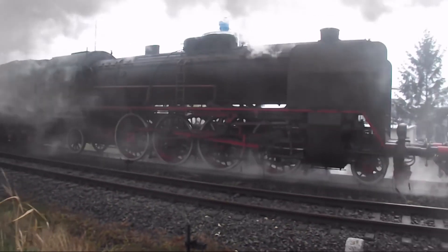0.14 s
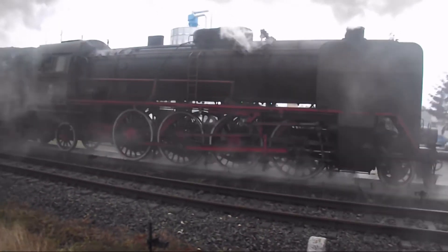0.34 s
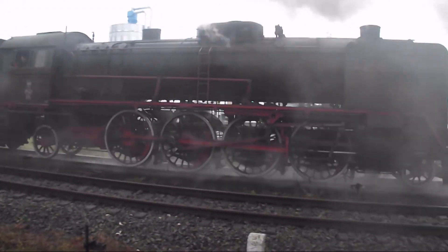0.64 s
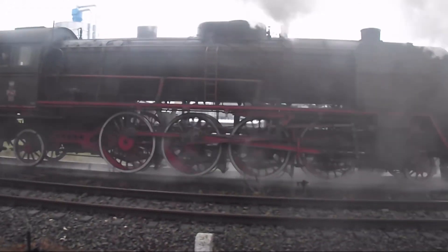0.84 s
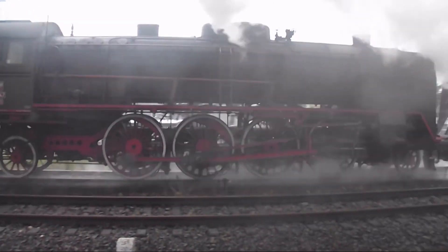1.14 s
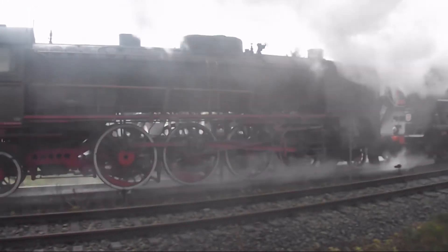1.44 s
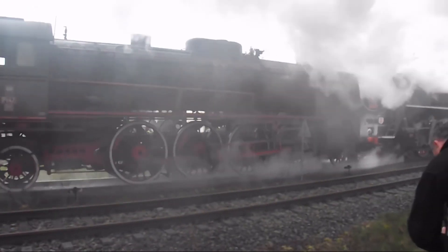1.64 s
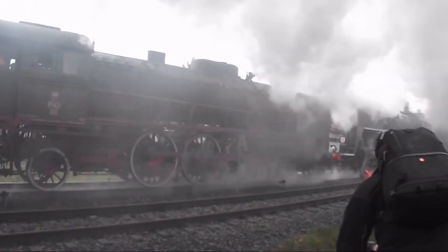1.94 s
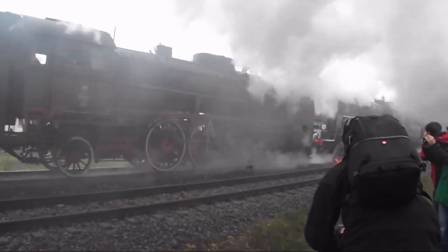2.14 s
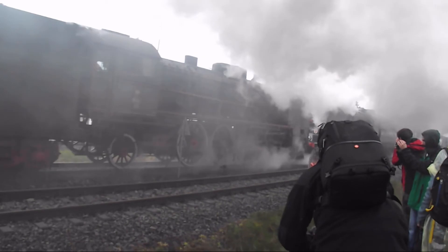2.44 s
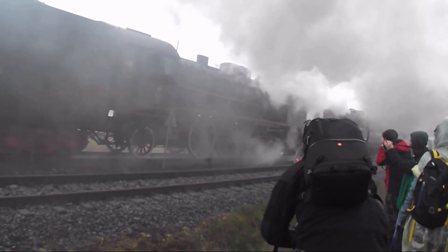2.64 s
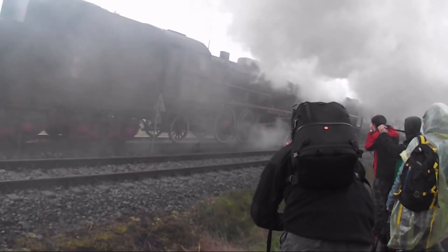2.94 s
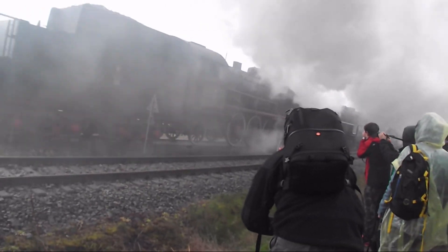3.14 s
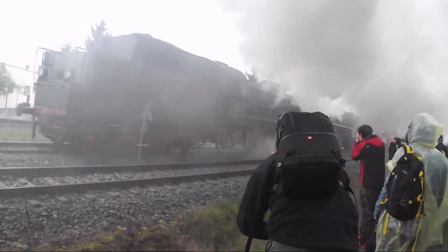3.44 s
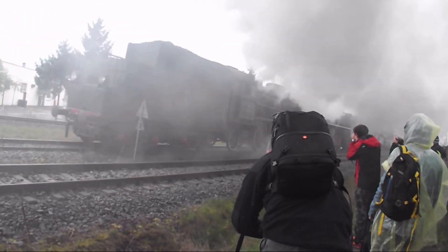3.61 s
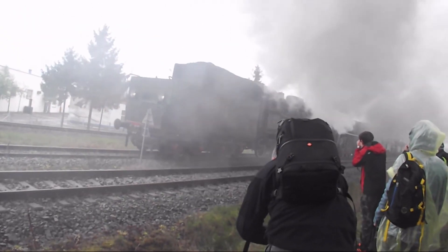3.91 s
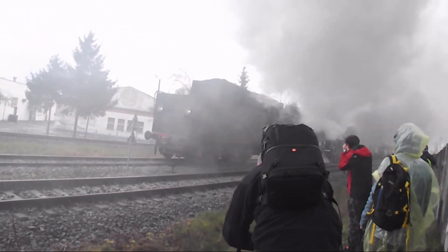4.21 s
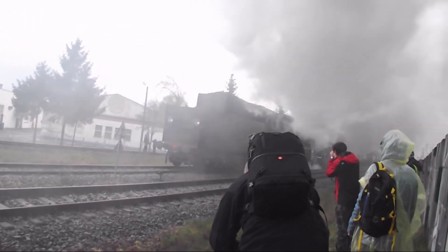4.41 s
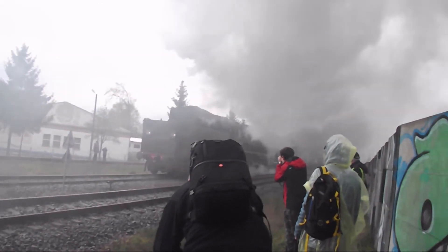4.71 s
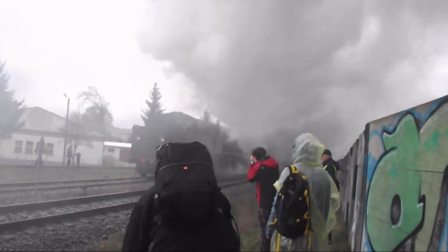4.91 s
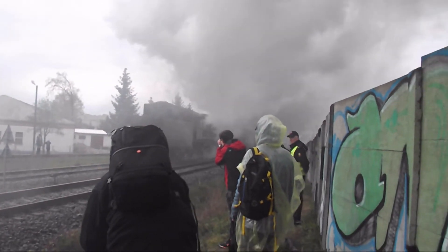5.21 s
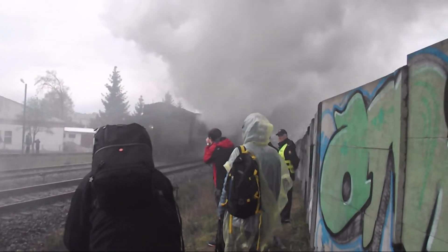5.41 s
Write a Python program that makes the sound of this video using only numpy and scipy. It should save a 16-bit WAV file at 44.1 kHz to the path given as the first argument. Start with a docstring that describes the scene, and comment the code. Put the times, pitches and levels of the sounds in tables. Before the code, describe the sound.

A steam locomotive holds one long whistle, several tones sounding together as a shrill, breathy chord. About half a second in, a single sharp crack briefly overloads the microphone. The whistle carries on as the engine rolls past and away, its upper tones wavering and shifting in brightness, over hissing steam and a low rumble. Heard from beside the track, the level repeatedly dips and swells back.

```python
"""Beside a railway track: a steam locomotive rolls past and away, holding one long chime whistle blast.
Three bells sound a chord; two also overblow near the octave, wandering as the steam jet varies.
Groups of partials turn from a front to a back level and beam past the listener, over hiss and rumble.
Early on the level leaps into overload with one sharp crack; later it keeps dropping and swelling back."""
import sys
import numpy as np
from scipy import signal
from scipy.fft import rfft, irfft, next_fast_len
from scipy.io import wavfile
from scipy.ndimage import uniform_filter1d

SR = 44100
rng = np.random.default_rng(int(sys.argv[2]) if len(sys.argv) > 2 else 0)


def materialize(psi):
    """Save the field psi as 16-bit PCM at rate SR to the path in sys.argv[1].

    A 1-D psi becomes a single channel; in a 2-D psi each row is a channel.
    """
    bounded = np.clip(np.atleast_2d(psi).T, -1, 1)
    quanta = np.round(bounded * 32767).astype(np.int16)
    wavfile.write(sys.argv[1], SR, quanta)


N = 245195
TIME = np.arange(N) / SR

# Low bell pitch. Each row: time in seconds, pitch in Hz.
LOW_PITCH_HZ = [(0, 403.7), (.6, 403), (1.1, 406.9), (1.8, 406.8), (2.6, 408.6), (3.5, 407.7), (4.5, 409.3),
                (5.56, 405.3)]
# Fundamental, strong ahead of the engine, fading in and out behind. Each row: time in seconds, level in dB.
LOW_ROOT_DB = [(0, -13), (.5, -12.5), (1.0, -14.5), (1.52, -17), (1.76, -27), (2.0, -18.5), (2.35, -25.5),
               (2.8, -21.5), (3.38, -26), (3.55, -21.5), (3.8, -26), (4.05, -20), (4.42, -28), (4.62, -22),
               (4.8, -29), (4.93, -20), (5.56, -24)]
# Upper and top overtones. Each row: harmonic number, relative level in dB.
LOW_UPPER_DB = [(5, -7), (6, -11.5)]
LOW_TOP_DB = [(6, -1.5), (7, -0.5), (8, -21), (9, -10)]


def low_bell():
    """Deepest steam-blown pipe: pure at first, reedy as one overtone after another beams past."""
    second_db = passing(front_db=-30.5, back_db=-37, beam_s=0.36, width_s=0.23, beam_db=0, fade_db=5.5)
    third_db = passing(front_db=-27, back_db=-32, beam_s=1.844, width_s=0.32, beam_db=13, fade_db=2)
    upper_db = passing(front_db=-33, back_db=-32, beam_s=2.51, width_s=0.63, beam_db=11, fade_db=-0.5)
    top_db = passing(front_db=-33.5, back_db=-32, beam_s=0.13, width_s=0.11, beam_db=8.5, fade_db=3)
    phase = pipe_phase(curves(LOW_PITCH_HZ)[0], waver=0.001013, jitter=0.0028)
    root = from_db(curves(LOW_ROOT_DB)[0]) * partials(phase, [(1, 0)], scatter=0.016, fade_hz=20)
    halo = from_db(-34) * partials(phase, [(1, 0)], scatter=0.81, fade_hz=6.8)
    second = from_db(second_db) * partials(phase, [(2, 0)], scatter=0.14, fade_hz=20)
    third = from_db(third_db) * partials(phase, [(3, 0)], scatter=0.16, fade_hz=18)
    upper = partials(phase, [(4, -1.2)], scatter=0.13, fade_hz=22.6)
    upper += partials(phase, LOW_UPPER_DB, scatter=0.33, fade_hz=21.1)
    top = partials(phase, LOW_TOP_DB, scatter=0.77, fade_hz=24.3)
    return root + halo + second + third + from_db(upper_db) * upper + from_db(top_db) * top


# Middle bell overtones, brightest behind the engine. Each row: time in seconds, lower and top gain in dB.
MIDDLE_OVERTONES_DB = [(0, -35.5, -43), (.6, -38.5, -42), (1.25, -34.5, -43), (1.6, -29.5, -32),
                       (2.06, -33.5, -31), (2.5, -28, -21.5), (2.9, -26, -26), (3.25, -27, -22.5),
                       (3.7, -27.5, -26), (3.95, -34, -29), (4.2, -29.5, -26.5), (4.9, -39.5, -28.5),
                       (5.35, -25.5, -25), (5.56, -32, -29)]
# Middle and high bell spectra. Each row: harmonic number, relative level in dB.
MIDDLE_LOWER_DB = [(2, -15.5), (3, 0), (4, -1.5), (5, -5.5)]
MIDDLE_TOP_DB = [(6, -5), (7, -1.5), (8, -17.5), (10, -30)]
HIGH_HARMONICS_DB = [(1, 5.5), (2, 3.5), (3, -15), (5, -10), (7, 8)]
MIDDLE_HZ, HIGH_HZ = 450.3, 468.3


def upper_bells():
    """Middle pipe, loudest just after the pass, and a weak high pipe that follows its lower overtones."""
    root_db = passing(front_db=-30.5, back_db=-30.5, beam_s=2.56, width_s=1.08, beam_db=6, fade_db=1.3)
    lower_db, top_db = curves(MIDDLE_OVERTONES_DB)
    phase = pipe_phase(MIDDLE_HZ, waver=0.001066, jitter=0.00295)
    root = from_db(root_db) * partials(phase, [(1, 0)], scatter=0.066, fade_hz=19)
    lower = partials(phase, MIDDLE_LOWER_DB, scatter=0.25, fade_hz=11)
    top = from_db(top_db) * partials(phase, MIDDLE_TOP_DB, scatter=0.16, fade_hz=28)
    high_phase = pipe_phase(HIGH_HZ, waver=0.002, jitter=0.00372)
    high = from_db(-18) * partials(high_phase, HIGH_HARMONICS_DB, scatter=0.41, fade_hz=3.5)
    return root + from_db(lower_db) * (lower + high) + top


# Overblown low bell. Each row: time in seconds, pitch in Hz, fundamental, overtone and top gain in dB.
LOW_SHRIEK_HZ_DB = [(0, 836.5, -39, -36.5, -53), (.6, 829, -25, -27.5, -54), (.92, 828, -34, -27.5, -57),
                    (1.06, 826.4, -22.5, -30, -44), (1.42, 825.4, -20.5, -28, -45.5),
                    (1.62, 822.5, -20.5, -23.5, -37.5), (1.76, 822, -23.5, -21, -45.5),
                    (1.89, 809, -30, -36, -60), (2.2, 813, -24.5, -27, -51), (2.85, 805.6, -25.5, -46, -55),
                    (3.28, 798.6, -23, -32, -56), (3.44, 823.5, -21, -19.5, -45.5),
                    (4.08, 825, -18.5, -23, -43), (4.25, 822.4, -22.5, -16, -39),
                    (4.47, 822.5, -22, -17.5, -39), (4.75, 822.2, -21.5, -20, -43),
                    (5.25, 824.8, -23.5, -21, -42.5), (5.56, 828, -25, -28, -45)]
# Its top and edge partials. Each row: harmonic number, relative level in dB.
LOW_SHRIEK_TOP_DB = [(2, 5.9), (5, 0.7), (6, 0.5)]
LOW_SHRIEK_EDGE_DB = [(7, 1), (8, -9), (9, -13), (10, -12), (12, -21)]
# Air and steam absorb the edge partials with distance. Each row: time in seconds, gain in dB.
NEARNESS_DB = [(0, -6), (1.6, 0), (4, -9), (5.56, -22)]


def low_shriek():
    """The low bell overblows near its octave, going flat and weak in mid-blast."""
    hz, root_db, overtones_db, top_db = curves(LOW_SHRIEK_HZ_DB)
    pass_db = passing(front_db=-6, back_db=-5.5, beam_s=0.26, width_s=0.26, beam_db=7, fade_db=1.5)
    phase = pipe_phase(hz, waver=0.00085, jitter=0.0014)
    root = from_db(root_db) * partials(phase, [(1, -0.9)], scatter=0.13, fade_hz=28.2)
    third = from_db(overtones_db) * partials(phase, [(3, 0.0043)], scatter=0.25, fade_hz=23.3)
    fourth = from_db(overtones_db + pass_db) * partials(phase, [(4, 0)], scatter=0.32, fade_hz=26)
    edge = from_db(curves(NEARNESS_DB)[0]) * partials(phase, LOW_SHRIEK_EDGE_DB, scatter=0.2, fade_hz=25)
    top = partials(phase, LOW_SHRIEK_TOP_DB, scatter=0.23, fade_hz=25)
    return root + third + fourth + from_db(top_db) * (top + edge)


# Overblown middle bell. Each row: time in seconds, pitch in Hz, fundamental and overtone gain in dB.
MIDDLE_SHRIEK_HZ_DB = [(0, 909, -36.5, -29.5), (.9, 912, -37, -23.5), (1.08, 907, -26.5, -26),
                       (1.6, 903, -29.5, -27.5), (1.7, 836, -27.5, -24), (1.9, 800, -35, -25.5),
                       (2.5, 785, -36, -40), (2.78, 738, -32.5, -29), (3.4, 766, -34, -26),
                       (3.7, 794, -33, -26.5), (4.35, 773, -33, -41), (4.85, 816, -45, -28.5),
                       (4.99, 843, -25, -21), (5.06, 878, -24, -29), (5.25, 879, -24.5, -17),
                       (5.56, 882, -22.5, -19)]
# Its overtones. Each row: harmonic number, relative level in dB.
MIDDLE_SHRIEK_TONE_DB = [(2, -19.5), (3, -2.5), (4, -17.5)]
FIFTH_DB, SCREECH_DB, FIFTH_DB_PER_DB = -36.5, -18.5, 2.7


def middle_shriek():
    """The middle bell overblows: it breaks, sags and snaps back; strong overtones bring out the fifth."""
    hz, root_db, overtones_db = curves(MIDDLE_SHRIEK_HZ_DB)
    fifth_db = FIFTH_DB + FIFTH_DB_PER_DB * (overtones_db - SCREECH_DB)
    phase = pipe_phase(hz, waver=0.001083, jitter=0.0022)
    root = from_db(root_db) * partials(phase, [(1, 0)], scatter=0.11, fade_hz=31)
    overtones = from_db(overtones_db) * partials(phase, MIDDLE_SHRIEK_TONE_DB, scatter=0.27, fade_hz=15)
    fifth = from_db(fifth_db) * partials(phase, [(5, 0)], scatter=0.15, fade_hz=17)
    return root + overtones + fifth


# Steam treble. Each row: time in seconds, jet, hiss and spray level in dB.
STEAM_LEVELS_DB = [(0, -26, -40, -53), (.18, -28, -46, -50), (.38, -29.5, -48, -59), (.6, -31, -48, -57.5),
                   (.92, -31.5, -44, -55), (1.08, -24.5, -44, -52.5), (1.45, -24.5, -39, -48),
                   (1.65, -24, -37, -41.5), (1.92, -25.5, -38.5, -55), (2.6, -21.5, -41.5, -53.5),
                   (3.2, -23, -39, -54.5), (3.58, -21.5, -41.5, -56), (3.75, -19.5, -35.5, -56),
                   (4.02, -25.5, -42, -55), (4.35, -24, -46, -61), (4.67, -20, -46, -62),
                   (4.85, -23, -51.5, -62.5), (5.56, -22, -50, -61.5)]
# Steam spectra. Each row: frequency in Hz, relative density in dB.
JET_HZ_DB = [(1500, -14), (2200, -7.5), (2500, -2.5), (2900, 4), (3250, 3.5), (3480, -10.5), (4000, -12.5),
             (5000, -21), (7000, -36)]
HISS_HZ_DB = [(3000, 3), (4500, 3.5), (6000, 2), (7300, -3), (8500, -15), (11000, -33.5)]
SPRAY_HZ_DB = [(6000, -11), (8500, 3), (11000, -1.5), (13000, -10.5), (15800, -14)]


def steam():
    """The whistle's turbulent jet, with hiss and fine spray that are brightest as the cylinders pass."""
    jet_db, hiss_db, spray_db = curves(STEAM_LEVELS_DB)
    jet = from_db(jet_db) * noise(JET_HZ_DB, flutter_db=2.5)
    hiss = from_db(hiss_db) * noise(HISS_HZ_DB, flutter_db=1.9)
    spray = from_db(spray_db) * noise(SPRAY_HZ_DB, flutter_db=2.4)
    return jet + hiss + spray


# Rumble and exhaust spectra. Each row: frequency in Hz, relative density in dB.
RUMBLE_HZ_DB = [(20, 2.5), (35, -10), (60, -16.5), (115, -18.5), (145, -20.5), (178, -15), (230, -21.5),
                (330, -21), (600, -23.5), (1200, -35.5)]
EXHAUST_HZ_DB = [(250, -10), (350, -15), (440, -8), (580, -7.5), (800, 6.5), (1030, -5), (1300, 5.5),
                 (1700, 5), (2200, 3.5), (3000, 5), (5000, -11)]
# Dull thuds. Each row: peak time in seconds, rise of the rumble in dB.
THUDS_DB = [(2.14, 3), (2.87, 2), (4.471, 9)]
THUD_WIDTH_S = 0.016


def engine():
    """The passing engine rumbles, with a few thuds and the rush of its exhaust."""
    rumble_db = passing(front_db=-37.5, back_db=-37.5, beam_s=2.1, width_s=1.47, beam_db=6.5, fade_db=1)
    thuds_db = sum(db * np.exp(-0.5 * ((TIME - peak_s) / THUD_WIDTH_S) ** 2) for peak_s, db in THUDS_DB)
    exhaust_db = passing(front_db=-32, back_db=-31, beam_s=2.8, width_s=0.9, beam_db=5.5, fade_db=-1.2)
    rumble = from_db(rumble_db + thuds_db) * noise(RUMBLE_HZ_DB, flutter_db=0.5)
    exhaust = from_db(exhaust_db) * noise(EXHAUST_HZ_DB, flutter_db=2.5)
    return rumble + exhaust


# Rasp spectrum. Each row: frequency in Hz, relative density in dB.
RASP_HZ_DB = [(55, -4), (110, 12), (220, -6), (1200, -8), (3800, -3), (7000, -12), (14000, -25)]
CRACK_START_S = 0.4537


def rasp(gain_db, t60_s):
    """A brief burst of noise that roughens the crack."""
    since_s = TIME - CRACK_START_S
    envelope = (since_s > 0) * from_db(gain_db - 60 * abs(since_s) / t60_s)
    return envelope * noise(RASP_HZ_DB, flutter_db=0)


# The crack's leap into overload. Each row: time since its start in seconds, gain in dB.
CRACK_GAIN_DB = [(0, 29), (.012, 29), (.025, 23), (.036, 16), (.046, 9), (.056, 3), (.12, 0)]
# Abrupt level drops. Each row: time in seconds, depth in dB.
DROPS_DB = [(0.735, 2.5), (0.841, 2.5), (0.912, 3.5), (1.092, 3), (1.312, 3.5), (1.947, 4), (2.187, 2.5),
            (2.267, 0.5), (2.356, 2.5), (2.67, 1), (2.723, 4.5), (2.778, 5), (2.895, 4.5), (3.011, 3),
            (3.139, 3.5), (3.275, 3.5), (3.368, 6), (3.574, 5), (4.127, 5.5), (4.295, 4.5), (4.371, 4),
            (4.484, 6.5), (4.708, 6), (4.799, 5.5), (4.887, 4.5), (4.997, 5), (5.069, 1.5), (5.15, 3.5),
            (5.266, 5), (5.323, 3)]


def level_jumps_db(swell_s, recover_s, swell_share):
    """The level leaps once for the crack; it swells before each drop and recovers after it."""
    gain_db = np.interp(TIME - CRACK_START_S, *np.transpose(CRACK_GAIN_DB), left=0, right=0)
    for drop_s, depth_db in DROPS_DB:
        since_s = TIME - drop_s
        swell = swell_share * np.exp(-abs(since_s) / swell_s)
        dip = (1 - swell_share) * np.exp(-abs(since_s) / recover_s)
        gain_db += depth_db * np.where(since_s < 0, swell, -dip)
    return uniform_filter1d(gain_db, size=2)


PASS_S, TURN_S, REFLECTION_FADE_HZ = 1.54, 0.17, 3.3
BEAM_STEEPNESS = 3.2  # 2 is Gaussian; more flattens the top


def passing(front_db, back_db, beam_s, width_s, beam_db, fade_db):
    """Level in dB of a source rolling by: it turns from front to back and its beam sweeps past once."""
    turned = 0.5 + 0.5 * np.tanh((TIME - PASS_S) / (2 * TURN_S))
    beam = np.exp(-0.5 * abs((TIME - beam_s) / width_s) ** BEAM_STEEPNESS)
    reflections_db = fade_db * turned * drift(REFLECTION_FADE_HZ)  # off ground and boiler
    return front_db + (back_db - front_db) * turned + beam_db * beam + reflections_db


def pipe_phase(hz, waver, jitter):
    """Phase of a pipe whose pitch wavers with the steam and trembles with the jet's turbulence."""
    pitch_hz = hz * (1 + waver * drift(6.89) + jitter * drift(82.8))
    return 2 * np.pi * np.cumsum(pitch_hz) / SR


def partials(phase, harmonics_db, scatter, fade_hz):
    """Pipe harmonics; the surroundings scatter a share of each one's power, which fades at random."""
    tone = 0
    for harmonic, db in harmonics_db:
        angle = round(harmonic) * phase + rng.uniform(0, 2 * np.pi)
        in_phase = np.sqrt(2 * (1 - scatter)) + np.sqrt(scatter) * drift(fade_hz)
        quadrature = np.sqrt(scatter) * drift(fade_hz)
        tone += from_db(db) * (in_phase * np.cos(angle) + quadrature * np.sin(angle))
    return tone


def noise(spectrum, flutter_db):
    """Turbulent noise of unit power with a given spectrum, its level fluttering."""
    hz, db = np.transpose(spectrum)
    size = next_fast_len(N)
    bins_hz = np.maximum(np.arange(size // 2 + 1) * SR / size, 1)
    skirts = np.minimum(bins_hz / hz[0], 1) ** 2 * np.minimum(hz[-1] / bins_hz, 1) ** 4
    shape = from_db(np.interp(np.log(bins_hz), np.log(hz), db)) * skirts
    steady = irfft(rfft(rng.standard_normal(size)) * shape, size)[:N]
    return unit_rms(steady * from_db(flutter_db * drift(21.6)))


def drift(rate_hz):
    """Slow random wander of unit spread: coarse noise through two one-pole low-passes."""
    hop, settle = 40, 2000
    pole = np.exp(-2 * np.pi * hop * rate_hz / SR)
    white = rng.standard_normal(N // hop + settle + 2)
    slow = signal.lfilter([1], [1, -2 * pole, pole * pole], white)[settle:]
    return np.interp(np.arange(N) / hop, np.arange(len(slow)), unit_rms(slow))


def curves(rows):
    """Each column after the time, interpolated to every sample."""
    times_s, *columns = np.transpose(rows)
    return [np.interp(TIME, times_s, column) for column in columns]


def from_db(db):
    """Decibels to gain."""
    return 10 ** (np.asarray(db) / 20)


def unit_rms(x):
    """Scale to unit power."""
    return x / np.sqrt(np.mean(np.abs(x) ** 2) + 1e-20)


def scene():
    """Whistle, steam, engine and rasp in mono."""
    whistle = low_bell() + upper_bells() + low_shriek() + middle_shriek()
    return (whistle + steam() + engine() + rasp(gain_db=-18, t60_s=0.14))[None]


CUTOFF_HZ = 15900


def record(dry):
    """The level jumps, peaks clip hard at full scale, the top is cut."""
    gain = from_db(level_jumps_db(swell_s=0.054, recover_s=0.061, swell_share=0.42))
    clipped = np.clip(dry * gain, -1, 1)
    lowpass = signal.ellip(10, 0.1, 80, CUTOFF_HZ, fs=SR, output="sos")
    return signal.sosfilt(lowpass, clipped)


dry = scene()
out = record(dry)
materialize(out)
```